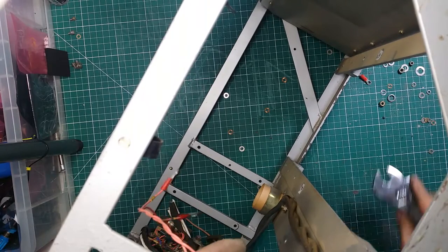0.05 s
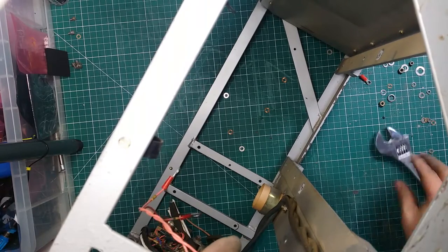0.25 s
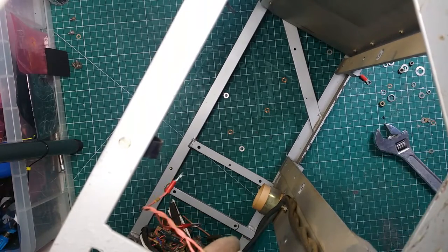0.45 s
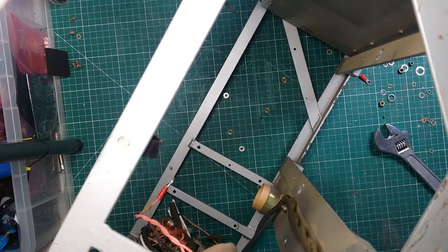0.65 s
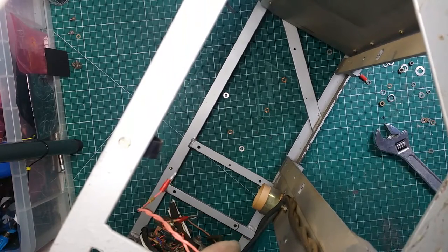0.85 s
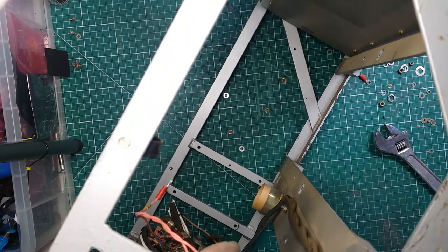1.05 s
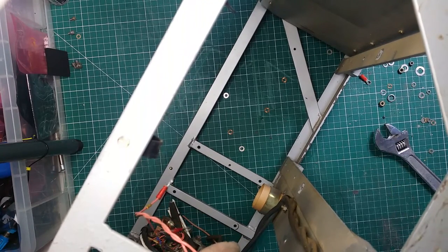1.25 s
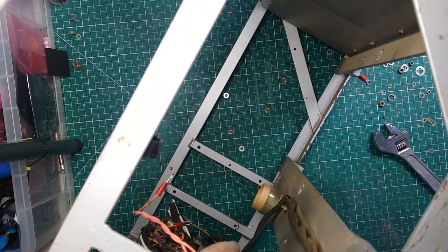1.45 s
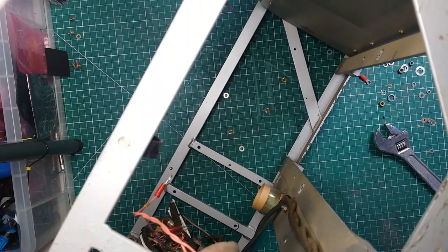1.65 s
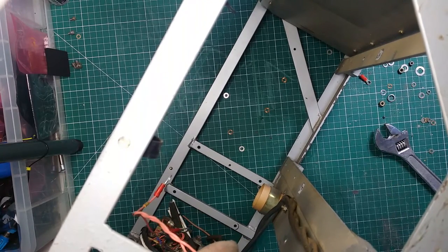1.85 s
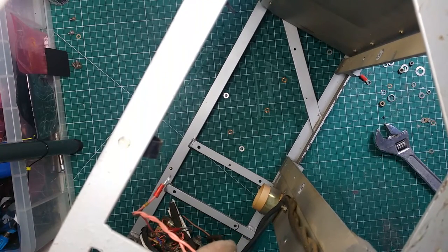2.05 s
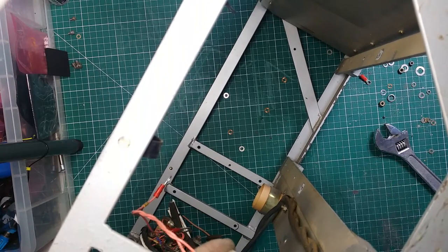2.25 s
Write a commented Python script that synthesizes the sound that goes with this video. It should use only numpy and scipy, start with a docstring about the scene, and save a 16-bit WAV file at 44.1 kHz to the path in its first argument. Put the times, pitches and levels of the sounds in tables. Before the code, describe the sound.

Three quick dull thuds with bright metal rattle as a wrench is set down, faint ticks after

```python
"""Three dull thuds with a bright metal rattle, then small ticks, scrapes and soft knocks in a quiet workshop.
A steel wrench lands three times on a mat-covered wooden bench, its loose jaw chattering.
Afterwards a hand shifts small metal parts on the left, and soft knocks travel through the bench top.
Mostly single clicks (blows, knocks) or dying flurries (rattle, ticks) ring the modes, plus a noise crack.
Scattered echoes make the room, and shaped noise makes its hush; a close stereo microphone hears it all."""
import sys
import numpy as np
from scipy import signal
from scipy.io import wavfile
from scipy.ndimage import uniform_filter1d

SR = 44100
rng = np.random.default_rng(int(sys.argv[2]) if len(sys.argv) > 2 else 0)


def makeup_ratio(level_db):
    """Linear amplitude ratio for a level in decibels (20 dB per factor of ten)."""
    decades = np.asarray(level_db, float) / 20
    return 10 ** decades


def store_wav(level_fs):
    """Save 16-bit WAV to argv[1]."""
    pcm = np.round(np.clip(np.atleast_2d(level_fs), -1, 1) * 32767)
    wavfile.write(sys.argv[1], SR, pcm.T.astype(np.int16))


N = 101429  # length of the scene in samples

# ringing modes of the wooden bench: (frequency [Hz], relative level [dB], time to fall 60 dB [s])
BENCH_MODES = [(67.2, -23, 0.26), (105.9, -22.5, 0.79), (149.9, -5.5, 0.27), (185.8, 4, 0.11),
               (315, -4, 0.071), (362.6, 2.5, 0.057), (501.4, 4.5, 0.04), (664, -5.5, 0.13),
               (916, -1, 0.033), (1460, 4.5, 0.02)]
# colour of the unpitched crack of a contact with the bench: (frequency [Hz], relative level [dB])
THUMP_COLOUR = [(80, -44), (220, 1), (580, -6), (3000, -9), (8000, -87.5)]


def evened(x):
    """Scales a signal to an average (rms) strength of one."""
    return x / np.sqrt(np.mean(x ** 2) + 1e-20)


def read_curve(points, hz):
    """Reads a table of (frequency, value) at any frequency, along a logarithmic pitch scale."""
    f, value = np.transpose(points)
    return np.interp(np.log(hz + 1), np.log(f + 1), value)


def colour_filter(points):
    """Makes a filter with the given spectrum that starts at once (minimum phase) and has unit energy."""
    log_gain = np.log(makeup_ratio(read_curve(points, abs(np.fft.fftfreq(4096, 1 / SR)))))
    phase = -signal.hilbert(log_gain).imag
    taps = np.fft.ifft(np.exp(log_gain + 1j * phase)).real[:2048]
    return taps / np.linalg.norm(taps)


def focus(loss_db):
    """Favours modes near a chosen pitch: loss_db is lost one octave away, growing with distance squared."""
    return lambda hz, pitch: -loss_db * np.minimum(np.log2(hz / pitch) ** 2, 4.5)


def slope(pivot_hz):
    """Tilts the spectrum by a number of dB per octave around a pivot frequency."""
    return lambda hz, tilt_db: tilt_db * np.log2(hz / pivot_hz)


def air():
    """Room hush: noise shaped in frequency, with slow patches, partly shared by the two channels."""
    # colour of the hush: (frequency [Hz], relative level [dB])
    hush_colour = [(25, -6), (65, -3), (200, -5), (320, -4), (420, -12), (1200, -17), (3500, -17),
                   (6500, -15), (7350, -11), (7700, -20), (14500, -28), (15800, -38)]
    # how alike left and right are: (frequency [Hz], likeness [0 to 1])
    hush_likeness = [(60, 0.78), (380, 0.94), (2380, 0.087), (15000, 0.13)]
    level_db, patch_db = -59, 0.24
    frames, hz = N // 256 + 5, np.fft.rfftfreq(1024, 1 / SR)
    a, b, c, d, patches = rng.standard_normal((frames, 513, 5)).T
    patches = uniform_filter1d(patches, 12, axis=0)
    patches = evened(uniform_filter1d(patches, 14, axis=1))
    same = np.clip(read_curve(hush_likeness, hz), -1, 1)[:, None]
    left = a + 1j * b
    right = same * left + np.sqrt(1 - same ** 2) * (c + 1j * d)
    gain = makeup_ratio(read_curve(hush_colour, hz)[:, None] + patch_db * patches)
    hush = signal.istft(np.array([left, right]) * gain, nperseg=1024, noverlap=768)[1][:, :N]
    return makeup_ratio(level_db) * evened(hush)


def room(x):
    """Room echoes: sparse taps of random sign, each frequency band dying at its own speed."""
    # how long the echoes last: (frequency [Hz], time to fall 60 dB [s])
    echo_decay = [(100, 0.43), (1500, 0.27), (12000, 0.19)]
    level_db, mono_hz = -7.5, 250
    taps = np.zeros((2, SR // 2))
    at = np.arange(200, SR // 2 - 20, 20)
    at = at + rng.integers(0, 20, (2, len(at)))
    np.put_along_axis(taps, at, rng.choice([-1., 1.], at.shape), 1)
    hz, t, bands = signal.stft(taps, SR, nperseg=256)
    bands = np.where(hz[:, None] < mono_hz, bands[0], bands)  # long waves reach both ports alike
    fade = makeup_ratio(-60 * t / read_curve(echo_decay, hz)[:, None])
    tail = signal.istft(bands * fade, SR, nperseg=256)[1]
    echoes = signal.fftconvolve(x, tail / np.linalg.norm(tail[0]), axes=1)[:, :N]
    return makeup_ratio(level_db) * echoes


def strike(events, modes, crack, lean, modes_db, crack_db, spread_db, pan_db, same, rate, flicker_db):
    """A low rate gives mostly one click, a high one a dying flurry; it rings the modes and adds a crack.

    events: (time [s], level [dB], contact time [s], favoured pitch [Hz] or brightness [dB/octave])
    lean: turns the last column into dB for each mode; the crack gets half of it
    spread_db: chance spread of mode strength; pan_db: left minus right level
    same: likeness of the channels, 0 to 1; rate: clicks per second; flicker_db: wavering of each mode
    """
    click_spread_db = 2.5
    rise_cycles = 0.57  # each mode swells over this many of its own cycles
    crack_rise = .12  # the crack swells over this share of the contact time
    flicker_samples = 300  # loose contact makes each mode waver on its own at this pace
    hz, db, t60 = np.transpose(modes)
    t = np.arange(SR // 2) / SR
    contact_t = t[:6000]
    first = contact_t == 0
    out = np.zeros((2, N + SR))
    rings = makeup_ratio(-60 * t / t60[:, None]) * np.exp(2j * np.pi * hz[:, None] * t)
    rings = rings * (1 - np.exp(-hz[:, None] * t / rise_cycles))
    for s, level_db, contact_s, tone in events:
        pick = rng.standard_normal((3, len(modes)))
        u, v, w = rng.random((3, 6000))
        waver = rng.standard_normal((len(modes), len(t) // flicker_samples + 1))
        waver = np.repeat(waver, flicker_samples, axis=1)[:, :len(t)]
        waver = uniform_filter1d(waver, size=flicker_samples, axis=1)
        fall = np.exp(-contact_t / contact_s)

        # the first click is certain and positive; any others have random times, signs and strengths
        hit = (u < rate / SR) | first
        sign = np.sign(v - .5 + first)
        strength = makeup_ratio(-click_spread_db * np.log(w * ~first + 0.066))
        drive = hit * sign * strength * fall
        drive = drive / np.linalg.norm(drive)

        # the modes start with different phases left and right, the more so the less alike the channels are
        gain = makeup_ratio(db + lean(hz, tone) + spread_db * pick[0])
        turn = np.exp(1j * (1 - same) * np.pi * pick[1:] / 2)
        free_ring = (turn * gain @ (rings * makeup_ratio(flicker_db * waver))).imag
        ring = signal.fftconvolve(free_ring, drive[None], axes=1) / np.linalg.norm(makeup_ratio(db))

        # the crack is a short puff of coloured noise
        left = u - .5
        right = same * left + np.sqrt(1 - same ** 2) * (w - .5)
        puff = np.array([left, right]) * fall * np.sqrt(12)  # sqrt(12) gives the noise unit strength
        puff = puff * (1 - np.exp(-contact_t / (crack_rise * contact_s)))
        tint = colour_filter([(f, d + lean(f, tone) / 2) for f, d in crack])
        at = round(s * SR)
        out[:, at:at + ring.shape[1]] += makeup_ratio(level_db + modes_db) * ring
        out[:, at:at + 8047] += makeup_ratio(level_db + crack_db) * signal.fftconvolve(puff, tint[None], axes=1)
    return out[:, :N] * makeup_ratio(np.array([[pan_db], [-pan_db]]) / 2)


def soft_knocks():
    """Soft knocks through the bench: mostly single clicks ring the wood's modes, all dull in colour."""
    # the knocks: (time [s], level [dB], brightness [dB/octave])
    knocks = [(0.025, -47, -3), (0.567, -47.5, -19), (0.84, -49.5, -14), (0.91, -39, -3),
              (1.027, -43, -9.5), (1.109, -42.5, -8), (1.166, -49.5, -10), (1.31, -32.5, -7),
              (1.422, -43, -10.5), (1.495, -38, -7), (1.56, -33.5, -2), (1.745, -35.5, -5.5),
              (1.768, -34.5, -3.5), (1.844, -46, -10.5), (1.965, -41, -12), (2.037, -44.5, -8.5),
              (2.15, -33.5, -1), (2.24, -47, -10)]
    contact_s = .012
    events = [(s, db, contact_s, tilt) for s, db, tilt in knocks]
    return strike(events, BENCH_MODES, THUMP_COLOUR, slope(250), modes_db=1.5, crack_db=-4.5,
                  spread_db=1, pan_db=-6, same=0.6, rate=36, flicker_db=4)


def small_parts():
    """Small metal parts tick and scrape: dense clicks ring them, reaching the left channel first."""
    # the ticks and scrapes: (time [s], level [dB], brightness [dB/octave])
    ticks = [(0.586, -42, 4), (0.8153, -42, 4.5), (0.9105, -40.5, -0.5), (1.0341, -44.5, 1.5),
             (1.1082, -47.5, 1.5), (1.3068, -32.5, 1), (1.417, -45.5, 4), (1.5212, -32.5, 1.5),
             (1.5637, -40.5, -5), (1.6066, -36, 5.5), (1.734, -36, 1), (1.8402, -44.5, 2.5),
             (1.9311, -32.5, 6), (2.0331, -42.5, 2.5), (2.1002, -39.5, 2.5), (2.1263, -28, 3),
             (2.145, -28.5, 5), (2.2041, -41.5, 3.5), (2.296, -27, 10)]
    # ringing modes of the parts: (frequency [Hz], relative level [dB], time to fall 60 dB [s])
    part_modes = [(1650, 3, 0.1), (1991, -2, 0.06), (2773, -2, 0.05), (4100, -3, 0.05), (4530, 0, 0.06),
                  (5940, 3, 0.019)]
    # colour of the scuffing noise: (frequency [Hz], relative level [dB])
    scuff_colour = [(500, 2.5), (1500, -7), (4300, 0), (8000, -6.5), (15500, -29)]
    contact_s, left_lead_s = .022, .00045
    events = [(s, db, contact_s, tilt) for s, db, tilt in ticks]
    left, right = strike(events, part_modes, scuff_colour, slope(4050), modes_db=-6.5, crack_db=-5.5,
                         spread_db=3.5, pan_db=4, same=0.49, rate=1497, flicker_db=7)
    late_right = np.r_[np.zeros(round(left_lead_s * SR)), right][:N]
    return np.array([left, late_right])


def jaw_chatter():
    """The loose jaw chatters: dense clicks ring the steel until the mat damps the wrench lying still."""
    # the rattles: (time [s], level [dB], contact time [s], favoured pitch [Hz])
    chatter = [(.011, -29, 0.012, 7000), (.025, -33.5, 0.013, 4020), (.2415, -15.5, 0.037, 10100),
               (.329, -17, 0.024, 6000), (.343, -7.5, 0.018, 6800), (.37, -8, 0.0036, 8560),
               (.378, -13, 0.017, 4750), (.4, -17, 0.061, 11000), (.445, -13, 0.042, 7450),
               (.4645, -14, 0.0019, 6150)]
    # ringing modes of the wrench: (frequency [Hz], relative level [dB], time to fall 60 dB undamped [s])
    wrench_modes = [(3755, -6, .2), (5915, -.6, .125), (6024, -7, .1), (6490, -6, .06), (8194, -5, .11),
                    (8351, -8, .1), (9092, -8, .11), (10630, -10, .07), (11730, -7, .07), (12101, -8, .12),
                    (14428, -6, .11)]
    # colour of the metal clash: (frequency [Hz], relative level [dB])
    clash_colour = [(500, -20.5), (2200, 16), (4500, 4.5), (6000, 3.5), (8500, 11), (12000, -2),
                    (15000, -19.5)]
    rest_s, rest_db_per_s = .487, 300  # when the wrench lies still, and the extra fading from then on
    rattle = strike(chatter, wrench_modes, clash_colour, focus(6), modes_db=-4, crack_db=-10,
                    spread_db=3.5, pan_db=1.5, same=0, rate=1495.5, flicker_db=6.5)
    damped = makeup_ratio(-rest_db_per_s * np.maximum(np.arange(N) / SR - rest_s, 0))
    return damped * rattle


def hard_blows():
    """Hard blows, mostly single clicks, ring the wood near a favoured pitch; a fainter knock follows."""
    # the wrench's landings, then a fainter knock at 1.31 s:
    # (time [s], level [dB], contact time [s], favoured pitch [Hz])
    blows = [(.2408, -6.5, 0.003, 426), (.243, 1.5, 0.009, 543), (.341, 0, 0.0095, 352),
             (.348, -1.5, 0.01, 1340), (.442, -4.5, 0.012, 315), (.447, -6.5, 0.022, 1040),
             (.487, -21, 0.0027, 353), (1.309, -30.5, 0.0033, 700)]
    return strike(blows, BENCH_MODES, THUMP_COLOUR, focus(10), modes_db=-1, crack_db=-15.5,
                  spread_db=0.4, pan_db=-4, same=0.44, rate=32, flicker_db=4)


def scene():
    """Wrench, parts and knocks on the bench, with the room's echoes and hush."""
    near = soft_knocks() + small_parts() + jaw_chatter() + hard_blows()
    return near + room(near) + air()


def low_pass(x):
    """Removes everything above the highest recorded frequency."""
    return signal.sosfilt(signal.butter(12, 16540, fs=SR, output="sos"), x)


def record(dry):
    """Stereo microphone: the deepest lows and the highest treble are cut."""
    low_cut_hz, high_cut_hz = 36, 16000
    cut = signal.lfilter(*signal.butter(2, low_cut_hz, "high", fs=SR), dry)
    cut = signal.sosfilt(signal.butter(8, high_cut_hz, fs=SR, output="sos"), cut)
    return low_pass(cut)


dry = scene()
out = record(dry)
store_wav(out)
```